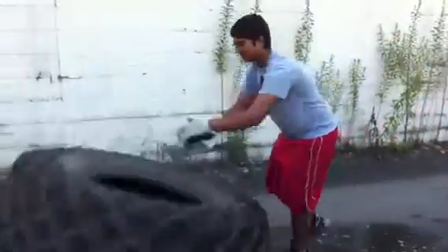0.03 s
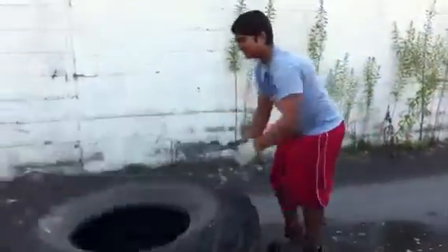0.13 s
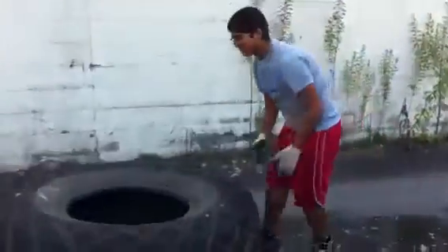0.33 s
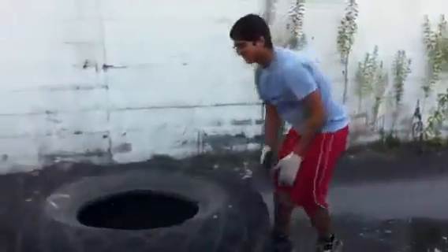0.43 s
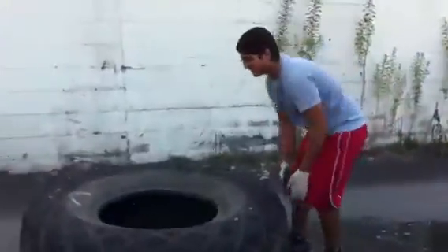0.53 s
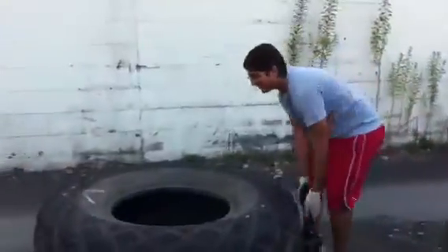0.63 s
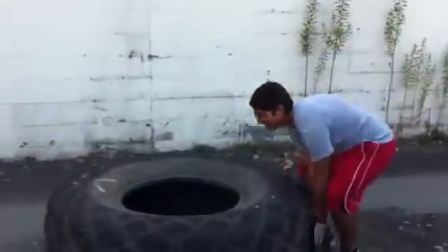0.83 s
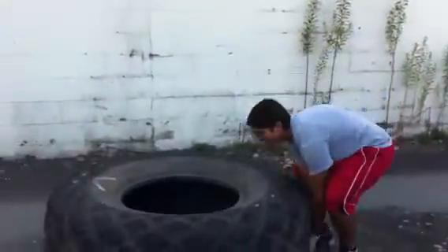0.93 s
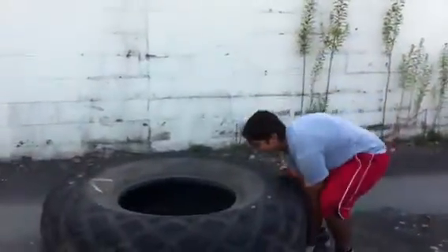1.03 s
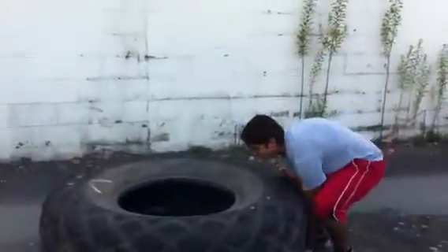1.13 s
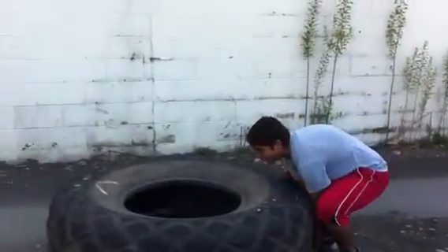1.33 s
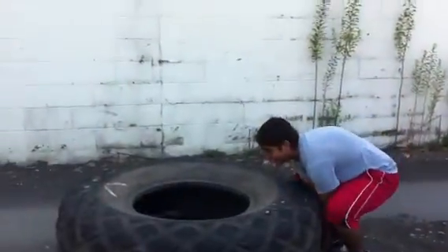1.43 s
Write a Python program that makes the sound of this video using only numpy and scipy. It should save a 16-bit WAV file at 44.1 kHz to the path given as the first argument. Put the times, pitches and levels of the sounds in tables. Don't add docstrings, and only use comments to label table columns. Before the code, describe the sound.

Huge rubber tire drops onto hard ground, a loud hollow thud with gritty spray, outdoors by a wall

```python
import sys
import numpy as np
from scipy import signal
from scipy.fft import rfft, irfft
from scipy.io import wavfile
from scipy.ndimage import uniform_filter1d

SR = 44100
rng = np.random.default_rng(int(sys.argv[2]) if len(sys.argv) > 2 else 0)


def volts(x):
    e = np.asarray(x, float) / 20
    return 10 ** e


def output_pcm(signal):
    pcm = np.clip(np.atleast_2d(signal).T, -1, 1) * 32767
    wavfile.write(sys.argv[1], SR, np.round(pcm).astype(np.int16))


N = 66150

# frequency in Hz, level in dB per Hz.
HUM_COLOUR = [(15, -79), (25, -57), (134, -8.5), (161, -8), (195, -7), (229, -7.5), (560, -10),
              (3160, -21.5), (16000, -36.5)]
# frequency in Hz, width in Hz, level in dB, end in seconds.
MOTOR_WHINES = [(650, 4, -63, 0.2), (523, 3.3, -68, 2.1)]
# time in seconds, level in dB.
GAIN_RIDE = [(0, 4), (.1, 4), (.23, 4.5), (.6, -3.5), (.85, -1.5), (1.0, -1.5), (1.25, 1), (1.5, 1.5)]
# frequency in Hz, level in dB per Hz.
SOLE_COLOUR = [(530, -46), (900, -4), (2830, -3.5), (3380, -11), (3680, -4.5), (6030, -16), (7960, -6.5),
               (10500, -2), (16000, -17)]
# start in seconds, rise in seconds, hold in seconds, level in dB, t60 in seconds.
SCUFFS = [
    (0.662, 0.00087, .003, -54, 0.047),
    (0.67, .003, 0.019, -57.5, 0.18),
    (0.705, 0.0071, .03, -51, .2),
    (.755, 0.012, 0.015, -46, 0.25),
    (0.804, .01, 0.043, -54, 0.21),
    (.885, .003, 0.036, -61.5, 0.3),
    (1.083, .01, 0.029, -62, 0.18),
    (1.133, .01, .03, -65, 0.5),
]
# time in seconds, level in dB, frequency in Hz, t60 in seconds.
STONE_TICKS = [(.657, -47.5, 2080, 0.022), (.718, -49, 1540, 0.043), (0.664, -43, 9600, 0.01),
               (.7815, -44, 3150, 0.0081), (.7945, -40, 1790, 0.024), (.942, -47, 13000, 0.0052),
               (1.122, -51.5, 306, 0.097), (1, -51.5, 230, 0.14), (.517, -45, 5400, 0.013)]
# frequency in Hz, level in dB per Hz.
SAND_COLOUR = [(1470, -4), (2500, -9), (3360, -9.5), (3830, -12.5), (5920, -24.5), (7710, -12),
               (13400, -11), (16000, -33)]
# start in seconds, rise in seconds, hold in seconds, level in dB, t60 in seconds.
SAND_SPRAYS = [
    (0, 0.0016, 0.036, -57.5, 0.12),
    (0.241, 0.0049, 0.029, -30.5, 0.2),
    (0.253, 0.0071, 0.011, -29, 0.15),
    (0.309, 0.00074, .008, -37.5, 0.15),
    (0.319, 0.0067, 0.036, -41, 0.076),
    (0.366, .005, 0.031, -49, 0.3),
    (0.464, 0.031, 0.024, -47.5, 0.29),
    (0.524, 0.0039, 0.018, -54, 0.049),
    (0.598, 0.011, 0.0062, -60, 0.3),
]
# frequency in Hz, level in dB per Hz.
AIR_COLOUR = [(120, -40), (220, -6), (450, 12), (700, 0), (1200, -0.5), (2200, -3.5), (3500, -9.5),
              (6500, -18.5)]
# frequency in Hz, t60 in seconds.
AIR_T60 = [(100, 0.44), (400, 0.65), (1200, 0.7), (3000, 0.12), (6000, 0.29)]
# start in seconds, level in dB.
AIR_RUSHES = [
    (.243, -23.5),
    (0.311, -34),
    (.34, -38.5),
    (0.401, -46),
    (0.48, -46.5),
    (.51, -52.5),
]
# start in seconds, rise in seconds, hold in seconds, level in dB, t60 in seconds.
AIR_BURST = [
    (0.2503, 0.00041, 0.019, -19, 0.044),
]
# time in seconds, thump level in dB, ring level in dB, slap level in dB.
BLOCK_LANDINGS = [(.2408, -10, -35, -30), (.2428, -17, -9.5, 1), (.2443, -1.5, -6, -14),
                  (.2521, -5.5, -1, -7), (.2585, -10, -10, -9), (.2676, -25, -14, -35),
                  (.275, -11, -18, -20.5), (.281, -21, -10.5, -12), (.298, -16, -16, -22.5),
                  (.308, -24, -34, -24), (0.3119, -12, -18, -20), (0.329, -12, -17, -28.5),
                  (.342, -26, -16.5, -22), (.355, -20, -32, -28), (.385, -42, -24.5, -30),
                  (.41, -27, -35, -48), (.4785, -19, -36, -27), (.4825, -21, -22, -28),
                  (.492, -25, -52, -30.5), (.5035, -54, -37, -53), (.515, -30.5, -34, -36.5),
                  (0.548, -44, -38.5, -48)]
# frequency in Hz, level in dB, t60 in seconds.
SIDEWALL_MODES = [(204, -10.5, 0.058), (253, 1, 0.05)]
# frequency in Hz, level in dB, t60 in seconds.
CARCASS_MODES = [(338, -7.5, 0.14), (365.2, -4.5, 0.095), (428.6, -4, 0.12), (508, 0, 0.08),
                 (554, -10, 0.072), (728, -10, 0.082), (802, -16, .08)]
# frequency in Hz, level in dB, t60 in seconds.
TREAD_MODES = [(1090, 2, 0.016), (1164, -5, 0.085), (1282, -6, 0.046), (1465, 5.5, 0.013),
               (1750, 0.5, 0.02), (1864, -6, 0.042), (1925, -1.5, 0.022), (2156, -7, 0.029),
               (2378, -7.5, 0.043), (2707, -7.5, 0.036), (3243, -12, 0.037)]
# time in seconds, level in dB, frequency in Hz, t60 in seconds.
GROUND_SHUDDERS = [
    (.243, -40, 55, 0.055),
    (0.288, -46, 78, 0.12),
    (.345, -60, 65, 0.15),
    (0.483, -44, 88, 0.24),
    (.51, -54, 56, .3),
    (1.299, -70, 108, .5),
    (1.43, -67, 91, .4),
]
# start in seconds, end in seconds,
# lower edge in Hz, level in dB.
THINNED_HIGHS = [
    (.226, .2395, 1500, -35),
    (.298, .3095, 5500, -9),
    (.296, .3095, 12500, -20),
    (.645, .656, 11500, -12),
    (.926, .939, 13000, -12),
]


def evened(x):
    return x / np.sqrt(np.mean(x ** 2) + 1e-20)


def read(points, hz):
    f, value = np.transpose(points)
    return np.interp(np.log(hz + 1), np.log(f + 1), value)


def add(mix, s, sound):
    part = mix[round(s * SR):][:len(sound)]
    part += sound[:len(part)]


def coloured(x, spectrum):
    hz = np.fft.rfftfreq(len(x), 1 / SR)
    inside = (hz > spectrum[0][0]) & (hz < spectrum[-1][0])
    return evened(irfft(rfft(x) * volts(read(spectrum, hz)) * inside, len(x)))


def fuzzy(hz, width_hz):
    f = np.fft.rfftfreq(N, 1 / SR)
    resonance = 1 / (1 + ((f - hz) / width_hz) ** 2)
    return evened(irfft(rfft(rng.standard_normal(N)) * resonance, N))


def ring(modes, soft_s):
    t = np.arange(SR // 2) / SR
    total = np.zeros(len(t))
    for hz, db, t60 in modes:
        total += volts(db - 60 * t / t60) * np.sin(2 * np.pi * hz * t)
    return total * (1 - np.exp(-t / soft_s))


def strokes(rows):
    t = np.arange(N) / SR
    power = np.zeros(N)
    for s, rise, hold, db, t60 in rows:
        attack = np.clip((t - s) / rise, 0, 1)
        dying_s = np.maximum(t - s - rise - hold, 0)
        power += (attack * volts(db - 60 * dying_s / t60)) ** 2
    return np.sqrt(power)


def grit(spectrum, rows):
    grains_per_s, size_spread_db = 12000, 1.5
    hits = rng.random(N) < grains_per_s / SR
    sizes = volts(size_spread_db * rng.exponential(1, N))
    return coloured(rng.standard_normal(N) * hits * sizes, spectrum) * strokes(rows)


def traffic():
    hum_db, patch_db = -51.5, 0.9
    drone_hz, drone_width_hz, drone_db = 166, 12, -59
    z = signal.stft(coloured(rng.standard_normal(N), HUM_COLOUR), SR, nperseg=1024)[2]
    patches = uniform_filter1d(rng.standard_normal(z.shape), 12, 0)
    patches = evened(uniform_filter1d(patches, 6, 1))
    hum = volts(hum_db) * signal.istft(z * volts(patch_db * patches), SR, nperseg=1024)[1][:N]
    hum = hum + volts(drone_db) * fuzzy(drone_hz, drone_width_hz)
    t = np.arange(N) / SR
    for hz, width_hz, db, end in MOTOR_WHINES:
        fade = np.clip((end - t) / 0.036, 0, 1)
        hum = hum + volts(db) * fuzzy(hz, width_hz) * fade
    return hum * volts(np.interp(t, *np.transpose(GAIN_RIDE)))


def shoe_scuffs():
    return grit(SOLE_COLOUR, SCUFFS)


def stone_ticks():
    out = np.zeros(N)
    for s, db, hz, t60 in STONE_TICKS:
        partials = [(hz, db, t60), (hz * 1.1, db + 0.5, t60), (hz * 1.5, db - 21, t60 / 2)]
        add(out, s, ring(partials, 0.0001))
    return out


def sand_sprays():
    return grit(SAND_COLOUR, SAND_SPRAYS)


def air_rush():
    out = grit(AIR_COLOUR, AIR_BURST)
    for s, db in AIR_RUSHES:
        noise = coloured(rng.standard_normal(SR), AIR_COLOUR)
        hz, t, z = signal.stft(noise, SR, nperseg=256)
        decay = volts(-60 * t / read(AIR_T60, hz)[:, None])
        tail = signal.istft(z * decay, SR, nperseg=256)[1]
        onset = np.minimum(np.arange(len(tail)) / SR / 0.0015, 1)
        add(out, s, volts(db) * tail * onset)
    return out


def ground_shudder():
    out = np.zeros(N)
    for s, db, hz, t60 in GROUND_SHUDDERS:
        add(out, s, ring([(hz, db, t60)], 0.0072))
    return out


def tire():
    out = np.zeros(N)
    for s, thump_db, ring_db, slap_db in BLOCK_LANDINGS:
        add(out, s, -0.7 * volts(thump_db) * ring(SIDEWALL_MODES, 0.0025))

        carcass = [(hz, db + 2.0 * rng.standard_normal(), t60) for hz, db, t60 in CARCASS_MODES]
        add(out, s, -0.4 * volts(ring_db) * ring(carcass, 0.00093))

        crisp, soft = [], []
        for mode in TREAD_MODES:
            group = crisp if rng.standard_normal() > 0 else soft
            group.append(mode)
        add(out, s, 0.32 * volts(slap_db) * ring(crisp, 0.00017))
        add(out, s + 0.00048, -0.3 * volts(slap_db) * ring(soft, 0.0009))

    cavity = (150.7, -23, 0.75)
    add(out, BLOCK_LANDINGS[0][0], ring([cavity], 0.05))
    return out


def scene():
    background = traffic() + shoe_scuffs() + stone_ticks()
    slam = sand_sprays() + air_rush() + ground_shudder() + tire()
    return (background + slam)[None]


def low_pass(x):
    return signal.sosfilt(signal.butter(12, 16470, fs=SR, output="sos"), x)


def record(dry):
    clip_level, low_cut_hz, top_edge_hz = 1.05, 45.6, 15850
    overloaded = clip_level * np.tanh(dry / clip_level)
    low_cut = signal.butter(2, low_cut_hz, "high", fs=SR, output="sos")
    x = signal.sosfilt(low_cut, overloaded)
    t, f = np.arange(N) / SR, np.fft.rfftfreq(N, 1 / SR)
    for start, end, hz, db in THINNED_HIGHS:
        inside = np.clip(np.minimum(t - start, end - t) / 0.0009, 0, 1)
        before = x * (t < end)
        highs = irfft(rfft(before) * np.clip((f - hz) / 300, 0, 1), N)
        x = x - (1 - volts(db)) * inside * highs
    x = irfft(rfft(x) * np.clip((top_edge_hz - f) / 400 + 1, 0, 1), N)
    return low_pass(x)


dry = scene()
out = record(dry)
output_pcm(out)
```